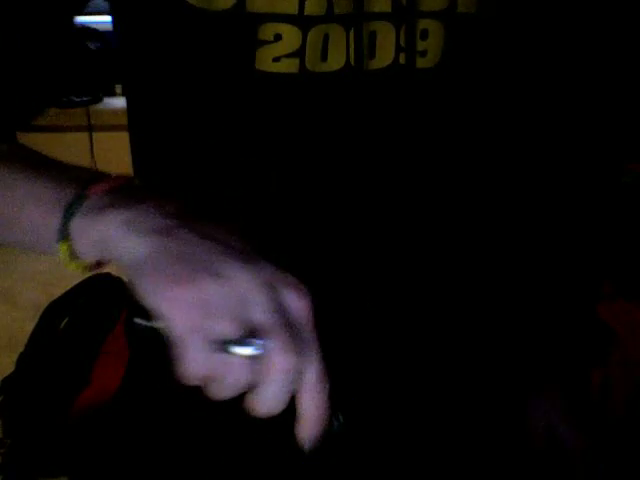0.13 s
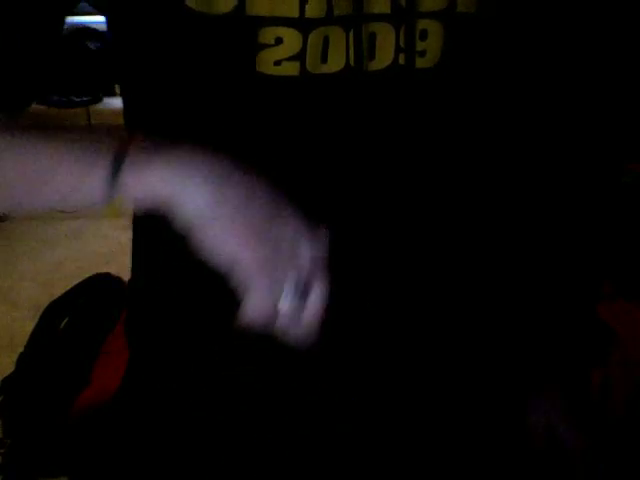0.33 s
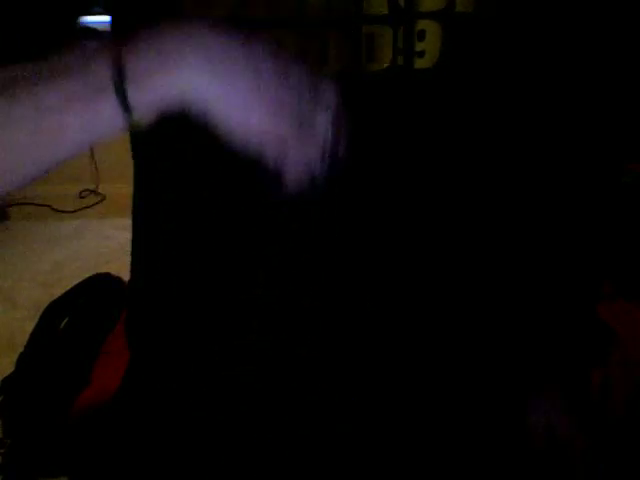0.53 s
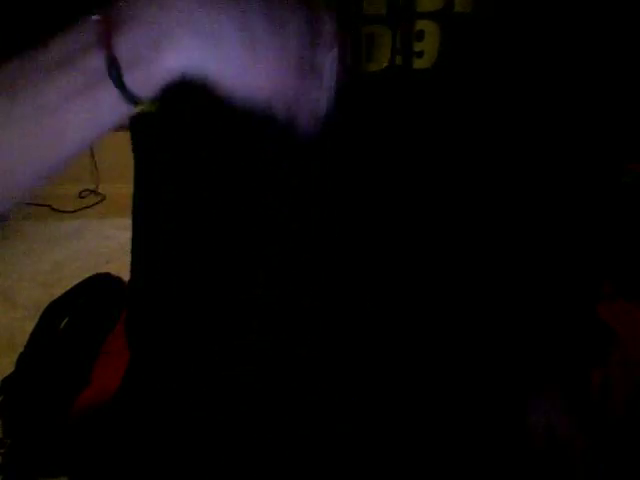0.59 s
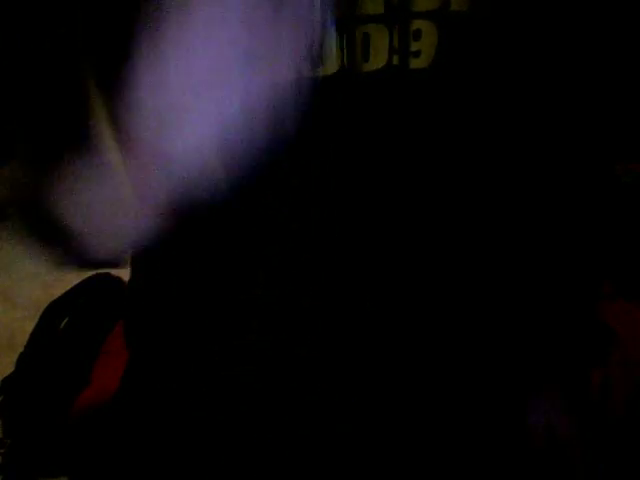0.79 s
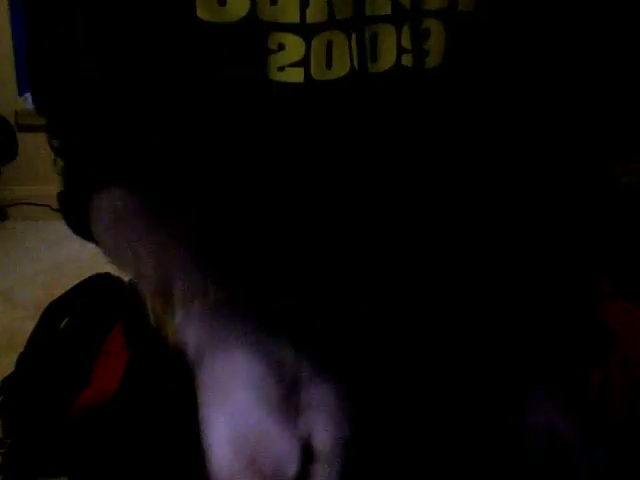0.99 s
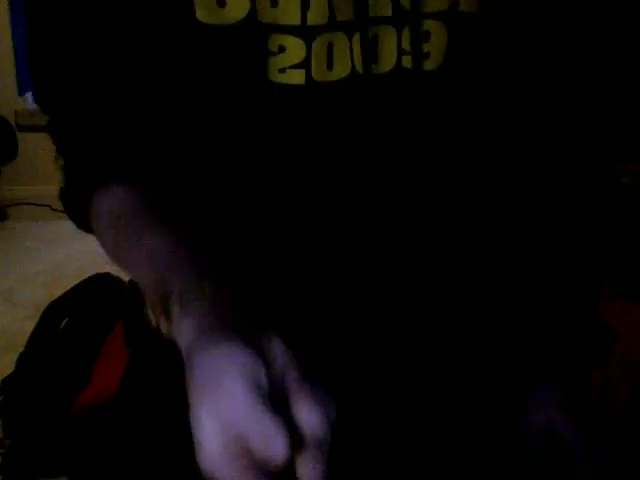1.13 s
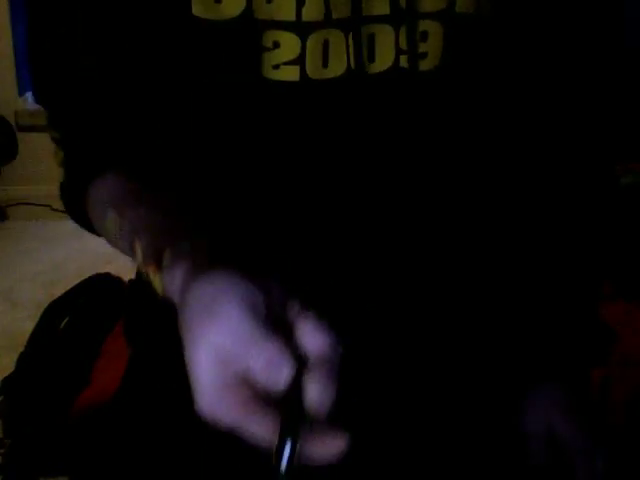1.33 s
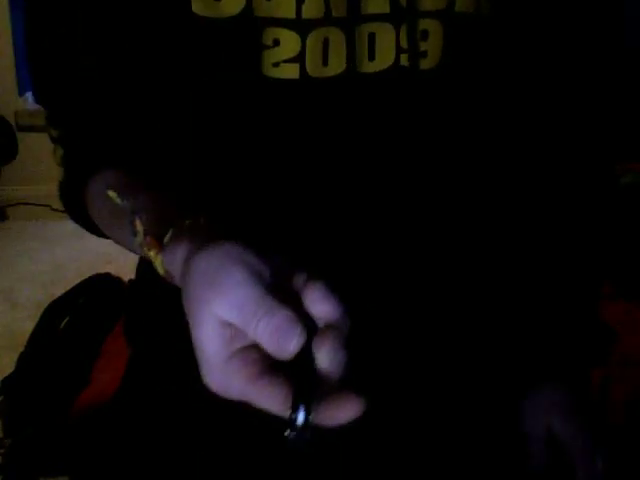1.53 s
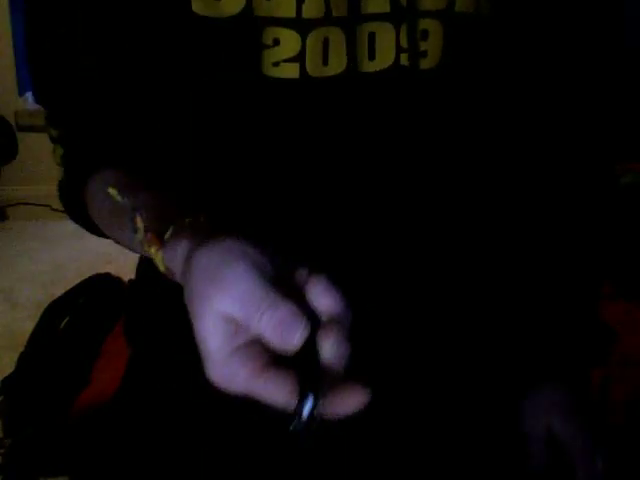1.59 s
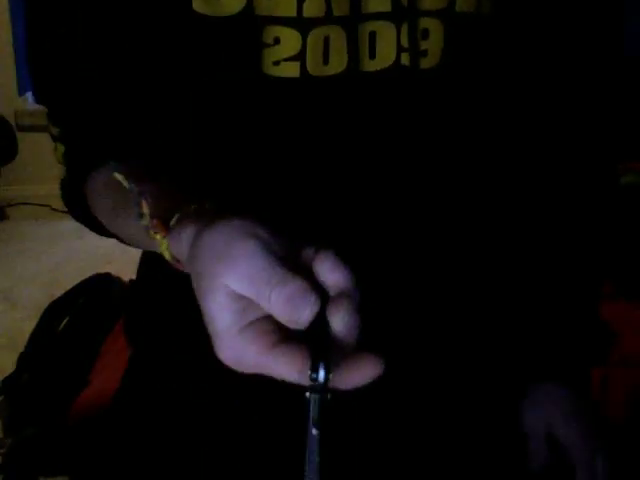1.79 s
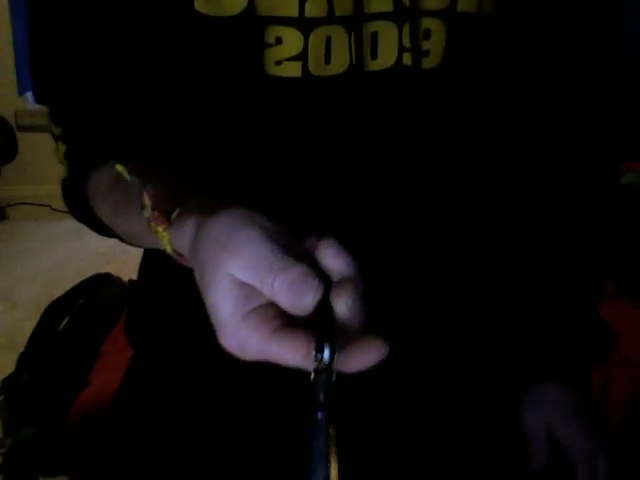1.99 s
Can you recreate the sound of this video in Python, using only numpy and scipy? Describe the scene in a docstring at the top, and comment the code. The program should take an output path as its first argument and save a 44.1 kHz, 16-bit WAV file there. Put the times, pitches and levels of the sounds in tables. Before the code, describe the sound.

Close up, a butterfly knife's metal handles tick, ring and clack shut in quick clusters, followed by a thin pivot squeak and soft sleeve bumps. The quiet room has low hum, hiss and a thin pulsing electrical whine.

```python
"""A quiet room, where a butterfly knife is flipped shut close to a small camera.
The metal handles clack and rattle as they meet, and one rings as it swings free until it is caught.
The pivot rubs and squeaks; hand and sleeve thud softly. Underneath sit room rumble, hiss, mains hum,
a faint high whistle and a thin electrical whine that pulses with the camera's frames."""
import sys
import numpy as np
from scipy import signal
from scipy.fft import rfft, irfft
from scipy.io import wavfile
from scipy.ndimage import uniform_filter1d

SR = 44100
rng = np.random.default_rng(int(sys.argv[2]) if len(sys.argv) > 2 else 0)


def master(y):
    """Save y as 16-bit WAV."""
    cut = np.clip(np.atleast_2d(y).T, -1, 1)
    pcm = np.round(cut * 32767)  # scale
    wavfile.write(sys.argv[1], SR, pcm.astype(np.int16))


N = 92610


def amp(db):
    """Decibels to gain."""
    return 10 ** (np.asarray(db) / 20)


def unit(x):
    """Scales to rms 1."""
    return x / np.sqrt(np.mean(x ** 2) + 1e-20)


def curve(points, hz):
    """Reads breakpoints on a log-frequency axis."""
    f, value = np.transpose(points)
    return np.interp(np.log(hz + 1), np.log(f + 1), value)


def add(mix, start_s, sound):
    """Drops a sound into the mix on its cue."""
    part = mix[max(round(start_s * SR), 0):][:len(sound)]
    part += sound[:len(part)]


def eq(x, gain):
    """Filters by a gain that is a function of frequency."""
    return irfft(rfft(x) * gain(np.fft.rfftfreq(N, 1 / SR)), N)


def noise_band(centre_hz, width_hz):
    """White noise through one resonant peak."""
    return eq(rng.standard_normal(N), lambda f: 1 / (1 + (2 * (f - centre_hz) / width_hz) ** 2))


def impulse(db):
    """Minimum-phase impulse response of unit energy for a dB spectrum."""
    log_gain = np.log(amp(np.r_[db, db[-2:0:-1]]))
    response = np.fft.ifft(np.exp(np.conj(signal.hilbert(log_gain)))).real
    return response / np.linalg.norm(response)


def tones(rows):
    """Steady sines at random phases."""
    t = np.arange(N) / SR
    return sum(np.sqrt(2) * amp(db) * np.sin(2 * np.pi * (hz * t + rng.random())) for hz, db in rows)


def ringing(modes):
    """A struck object: a sum of dying sines."""
    t = np.arange(SR // 2) / SR
    return sum(amp(db - 60 * t / t60) * np.sin(2 * np.pi * hz * t) for hz, db, t60 in modes)


def swells(rows, width_hz, sag_hz=0):
    """Rubbed resonances: noise bands that fade in and out, with an optional droop in pitch."""
    out = np.zeros(N)
    for start_s, length_s, pitch_hz, db in rows:
        n = int(length_s * SR)
        progress = np.arange(n) / n
        band = signal.hilbert(noise_band(pitch_hz, width_hz))[:n]
        droop = np.exp(-2j * np.pi * np.cumsum(sag_hz * progress ** 2) / SR)
        add(out, start_s, amp(db) * unit((band * droop).real * np.sin(np.pi * progress)))
    return out


# EQ of the rumble and hiss (frequency [Hz], relative level [dB])
BED_EQ = [(15, -27), (30, -11), (60, 0.5), (100, 0), (170, -0.5), (280, -4.5), (450, -5.5), (800, -10),
          (1500, -16), (2600, -21), (3600, -30), (5800, -24.5), (8000, -25.5), (11000, -31.5), (15500, -41)]
# how mono that bed is (frequency [Hz], left-right likeness [0-1])
BED_LIKENESS = [(25, 0.9), (70, 1), (300, 0.96), (2000, .86), (4000, 0.98), (10000, 0.04)]
# mains hum partials (frequency [Hz], level [dB])
MAINS_HUM = [(60, -70), (120, -56)]


def room_tone(bed_db=-56):
    """A bed of room rumble and microphone hiss, nearly mono in the bass, with mains hum."""
    mid = eq(rng.standard_normal(N), lambda f: amp(curve(BED_EQ, f)))
    side = eq(rng.standard_normal(N), lambda f: amp(curve(BED_EQ, f)))
    side = eq(side, lambda f: np.sqrt(np.clip(1 - curve(BED_LIKENESS, f), 0, 1) / 2))
    return amp(bed_db) * np.array([mid + side, mid - side]) / mid.std() + tones(MAINS_HUM)


def whistle(level_db=-72):
    """A very high electrical whistle, steady in level and slightly unsteady in pitch."""
    phase = np.angle(signal.hilbert(noise_band(centre_hz=15245, width_hz=40)))
    return amp(level_db) * unit(np.cos(phase))


# partials of the camera's whine (frequency [Hz], level [dB])
WHINE_TONES = [(8000, -56.5), (12950, -74.5)]
# EQ of the hiss that pulses with it (frequency [Hz], relative level [dB])
WHINE_HISS_EQ = [(2000, -27), (5000, 6), (7000, -6), (11000, 12.5), (13500, 5), (16000, -4)]


def camera_whine(frame_hz=14.99, first_on_s=0.018, duty=0.485, hiss_db=-68.5):
    """Electrical whine and hiss, gated on for about half of every camera frame."""
    frame_phase = (np.arange(N) / SR - first_on_s) * frame_hz % 1
    gate = uniform_filter1d((frame_phase < duty).astype(float), size=24)
    hiss = unit(eq(rng.standard_normal(N), lambda f: amp(curve(WHINE_HISS_EQ, f))))
    return gate * (tones(WHINE_TONES) + amp(hiss_db) * hiss)


# decay of the room (frequency [Hz], t60 [s])
REVERB_DECAY = [(500, 1), (4000, 0.4), (8000, 0.29), (15000, 0.16)]
# tone of its tail (frequency [Hz], relative level [dB])
REVERB_EQ = [(2000, 2.5), (5000, 1.5)]


def room_reverb(x, wet_db=-11.5, build_s=0.0035):
    """A diffuse tail that blooms quickly and loses its treble first."""
    hz, t, noise = signal.stft(rng.standard_normal(SR), SR, nperseg=256)
    decay_db = 60 * t / curve(REVERB_DECAY, hz)[:, None]
    envelope = (1 - np.exp(-t / build_s)) * amp(curve(REVERB_EQ, hz)[:, None] - decay_db)
    tail = signal.istft(noise * envelope, SR, nperseg=256)[1]
    return amp(wet_db) * signal.fftconvolve(x, tail / np.linalg.norm(tail))[:N]


# hand and sleeve bumps (time [s], length [s], pitch [Hz], level [dB])
HAND_THUDS = [(.94, 0.16, 190, -62), (1.1, 0.089, 154, -50.5), (1.35, 0.14, 83, -57),
              (1.74, 0.11, 170, -56.5)]


def hand_thuds():
    """Hand and sleeve thud in soft swells of low noise."""
    return swells(HAND_THUDS, width_hz=115)


# thin squeaks (time [s], length [s], pitch [Hz], level [dB])
PIVOT_SQUEAKS = [(1.196, 0.031, 8420, -53.5), (1.214, 0.052, 8520, -59), (1.54, 0.088, 5920, -66)]
# airy slides (time [s], length [s], pitch [Hz], level [dB])
PIVOT_SLIDES = [(.652, 0.099, 6800, -60.5), (.955, 0.044, 9150, -52.5)]


def pivot():
    """The handle slides round its pivot and squeaks, the squeak sagging as the handle slows."""
    return swells(PIVOT_SQUEAKS, width_hz=81, sag_hz=55) + swells(PIVOT_SLIDES, width_hz=3500)


# EQ of a metal contact (frequency [Hz], relative level [dB])
METAL_EQ = [(200, -28), (1300, -16), (2200, -17.5), (3600, -13), (4200, -17), (4750, -4.5), (5700, -1),
            (6500, -3), (7500, -0.5), (9400, -11), (10300, 1.5), (10900, -13.5), (11900, -8.5),
            (12900, -21), (13900, -16), (14500, -24), (15500, -14)]


def metal_colour():
    """The bright spectrum shared by all the knife's hits, as frequencies and their dB."""
    hz = np.fft.rfftfreq(1024, 1 / SR)
    return hz, curve(METAL_EQ, hz)


# modes of the loose handle (frequency [Hz], relative level [dB], t60 [s])
SWING_MODES = [(4566, -30.5, .75), (5927, -15, .1), (7230, -30, .25), (8185, -1, .235), (10460, -16, .05),
               (11842, -6, .075)]
# knocks that ring it (time [s], gain [dB], finger damping [dB/octave], free swing [s])
SWING_KNOCKS = [(0.6004, -24.5, 5, .1), (1.14, -35.5, 47, 0.12)]


def free_handle(catch_db_per_s=145, send_db=21):
    """The loose handle rings until caught and the room echoes the knock; fingers mute the upper modes."""
    rings, reverb_send = np.zeros((2, N))
    _, metal_db = metal_colour()
    knock = impulse(metal_db)
    lowest_hz = SWING_MODES[0][0]
    for start_s, gain_db, damping, free_s in SWING_KNOCKS:
        ring = ringing([(hz, db - damping * np.log2(hz / lowest_hz), t60) for hz, db, t60 in SWING_MODES])
        held_s = np.maximum(np.arange(len(ring)) / SR - free_s, 0)
        add(rings, start_s, amp(gain_db - catch_db_per_s * held_s) * ring)
        add(reverb_send, start_s, amp(gain_db - damping + send_db) * knock)
    return rings + room_reverb(reverb_send)


# modes of the handles in the hand (frequency [Hz], relative level [dB], t60 [s])
HELD_MODES = [(5170, -9, 0.15), (5421, -12, 0.16), (5570, -10, 0.16), (6300, -4, 0.18), (7150, -3, .26),
              (7940, 2, 0.13), (8250, 4, 0.24), (8200, -2, 0.2), (9200, 4, 0.23)]


def held_handles(detune=0.0059, spread_db=1):
    """One ring of the held handles, each mode's pitch and level nudged as the grip shifts."""
    modes = []
    for hz, db, t60 in HELD_MODES:
        shift, push = rng.uniform(-1, 1, 2)
        modes.append((hz * (1 + detune * shift), db + spread_db * push, t60))
    return ringing(modes)


# metal-on-metal hits (time [s], relative level [dB], body below 4.5 kHz [relative dB],
# top above 10 kHz [relative dB], resonance [Hz], resonance boost [dB], rattle t60 [s])
CONTACTS = [(0.177, -36, -27.5, -39, 3300, 17, 0.019), (0.2133, -40.5, -32, -45, 5800, 13, 0.025),
            (.254, -26.5, -2, -12, 7230, 8, 0.012), (0.2578, -24.5, -11, -4, 7550, 2, 0.016),
            (.265, -26, -30, -18, 6660, 10, 0.015), (.334, -32.5, -18, -3, 7200, 6, 0.017),
            (.405, -43, -30, -35, 6640, 18, 0.016), (0.445, -35.5, -20, -34, 6940, 3, 0.034),
            (0.4707, -43, -34, -19, 6100, 20, 0.03), (.578, -45, -2, -22, 6000, 17, 0.06),
            (0.6004, -24, -24, -5.5, 4800, 4.5, 0.041), (0.819, -28.5, -29, -26, 8300, 13, 0.022),
            (0.8259, -21, -28, -18, 5580, 10, 0.031), (0.8313, -15.5, -31, -24, 7560, 6, 0.014),
            (0.8348, -21, -29, -25, 7650, 0, 0.014), (0.8372, -23, -27, -25, 5630, 9, .011),
            (0.8756, -21, -28, -22, 8900, 10, 0.0063), (.951, -29.5, -34, -36, 6940, 12, 0.012),
            (.956, -22, -19, -32, 5800, 3, 0.02), (0.9593, -24.5, -20, -40, 7350, 7.5, 0.042),
            (0.9612, -18, -26, -18, 8870, 17, 0.009), (0.977, -22, -40, -24, 9450, 24, 0.0074),
            (1.0028, -38, -37, -27, 9300, 10, 0.015), (1.0126, -36, -24, -30, 5460, 11, 0.04),
            (1.0194, -32.5, -25, -37, 8150, 16, 0.021), (1.022, -33.5, -10, -35, 5660, 7, 0.028),
            (1.0377, -29, -21, -43, 5000, 3, 0.03), (1.0394, -19.5, -39, -52, 8030, 21, 0.0098),
            (1.1275, -32.5, -5, 4, 6080, 13, 0.042), (1.135, -32, -14, -5, 7340, 12, 0.064),
            (1.1394, -34.5, -10, -4, 5900, 17, 0.058), (1.551, -49, -12, -27, 2200, 19, 0.035),
            (1.734, -48, -1, -30, 6040, 14, 0.051)]


def clacks(clack_db=-7.5, ring_db=-41, tick=2, shelf_depth=0.49, half_width_hz=380):
    """Each contact is a sharp tick and a short dense rattle, and sets the held handles ringing."""
    out = np.zeros(N)
    t = np.arange(4096) / SR
    hz, metal_db = metal_colour()
    low_shelf, high_shelf = np.interp(hz, [4000, 5000], [1, 0]), np.interp(hz, [9300, 11000], [0, 1])
    flat_body_db, flat_top_db = -24, -16.5
    for start_s, db, body_db, top_db, peak_hz, boost_db, t60 in CONTACTS:
        rattle = rng.choice([-1, 1], len(t)) * amp(-60 * t / t60)
        rattle[0] = tick
        shelves = low_shelf * (body_db - flat_body_db) + high_shelf * (top_db - flat_top_db)
        resonance = boost_db / (1 + ((hz - peak_hz) / half_width_hz) ** 2)
        clack = signal.fftconvolve(rattle, impulse(metal_db + shelf_depth * shelves + resonance))
        clack *= np.linalg.norm(rattle) / np.linalg.norm(clack)  # the EQ changes tone, not energy
        add(out, start_s, amp(db + clack_db) * clack)
        add(out, start_s, amp(db + ring_db) * held_handles())
    return out


# stereo width of the close sounds (frequency [Hz], side over mid [ratio])
STEREO_WIDTH = [(3000, .01), (4500, 0.076), (6000, 0.24), (8000, 0.28), (14000, 0.55)]


def scene():
    """Knife, whine and whistle at two close microphone ports, over the thuds and room tone."""
    hits = clacks()
    close = hits + pivot() + room_reverb(hits) + free_handle() + camera_whine() + whistle()
    side = eq(close, lambda f: -1j * curve(STEREO_WIDTH, f))  # 90 degrees off: width without panning
    return np.array([close + side, close - side]) + hand_thuds() + room_tone()


def record(dry, cutoff_hz=15700):
    """A steep low-pass, the recorder's band limit, takes off the highest air."""
    lowpass = signal.firwin(255, cutoff_hz, window=("kaiser", 8), fs=SR)
    return signal.oaconvolve(dry, lowpass[None], "same")


dry = scene()
out = record(dry)
master(out)
```